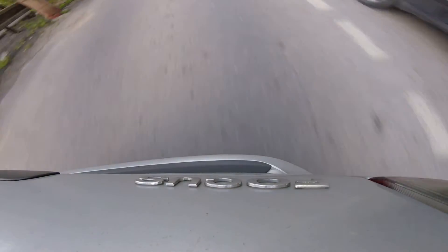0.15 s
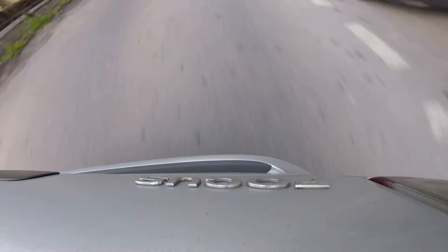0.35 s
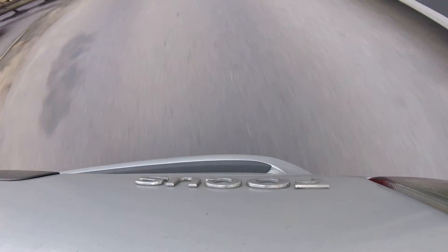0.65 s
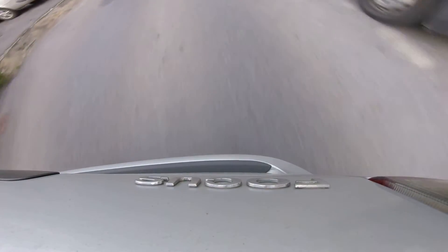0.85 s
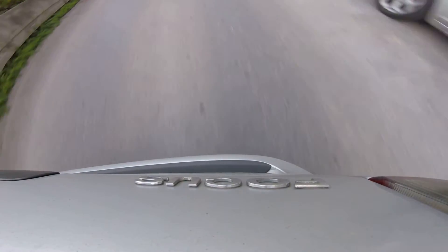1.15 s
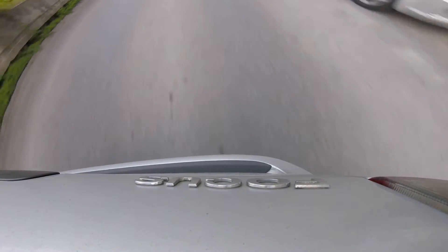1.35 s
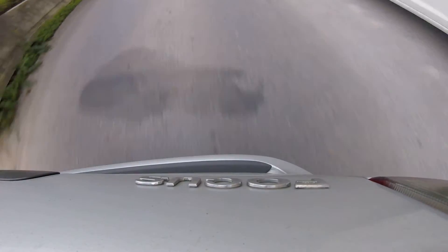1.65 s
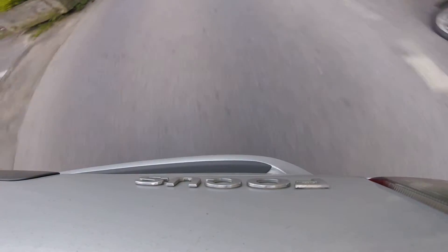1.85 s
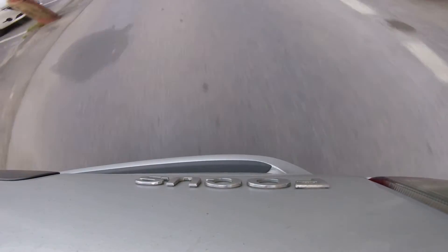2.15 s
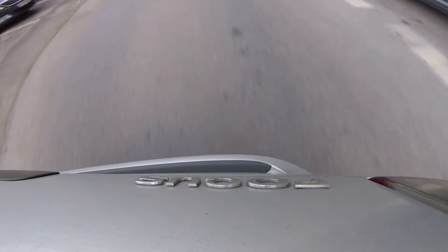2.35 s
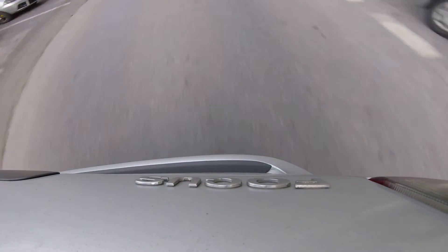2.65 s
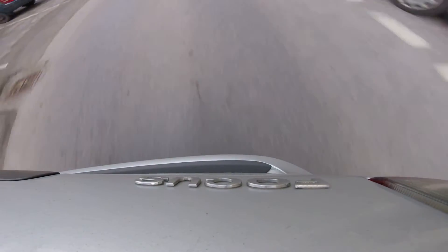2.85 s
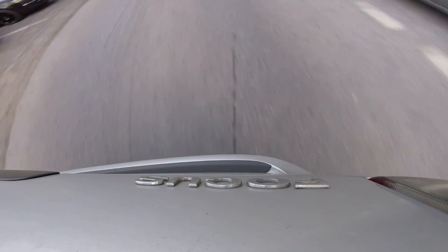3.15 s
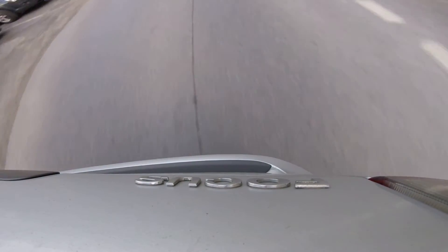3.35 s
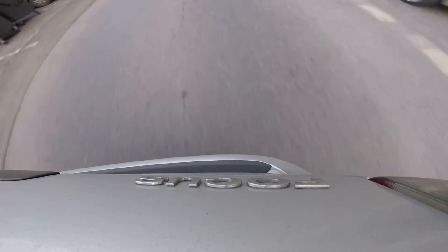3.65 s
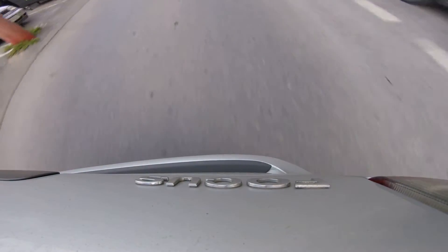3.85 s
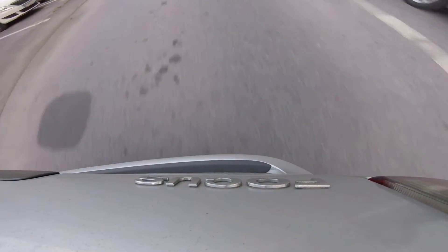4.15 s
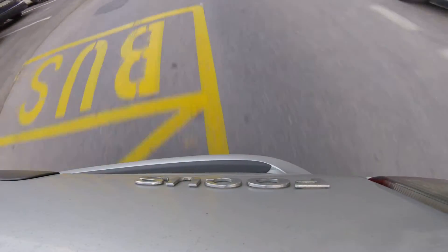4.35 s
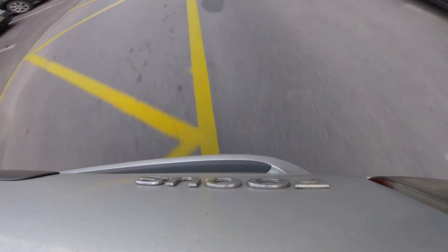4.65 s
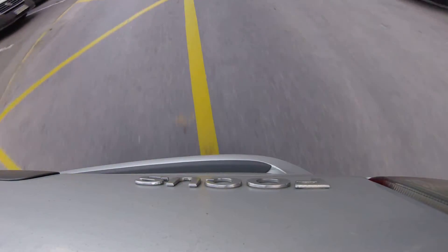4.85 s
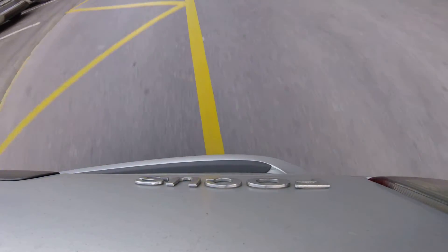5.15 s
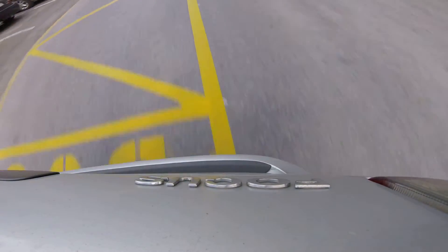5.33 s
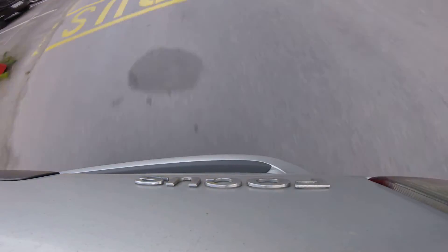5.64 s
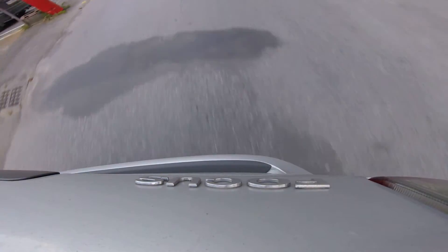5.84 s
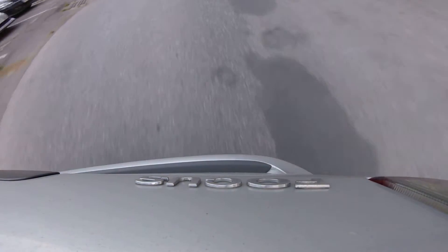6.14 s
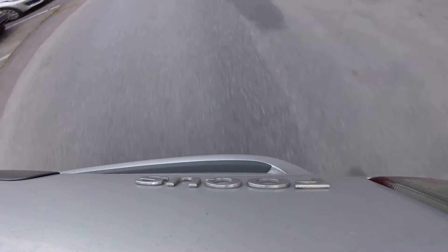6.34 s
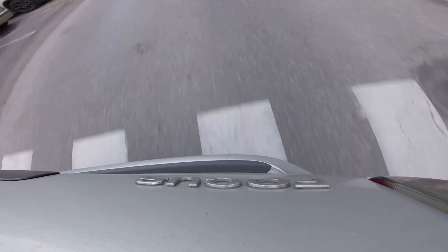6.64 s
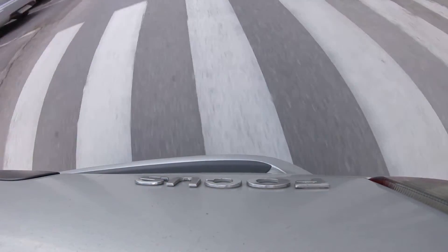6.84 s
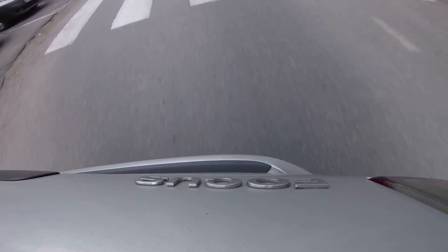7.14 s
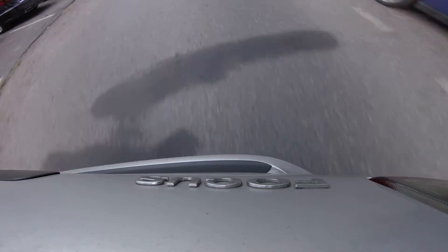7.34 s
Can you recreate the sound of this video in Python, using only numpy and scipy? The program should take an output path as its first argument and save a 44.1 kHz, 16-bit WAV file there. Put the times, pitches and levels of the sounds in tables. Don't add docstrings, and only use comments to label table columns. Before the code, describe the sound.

A car's open exhaust whistles down as the throttle shuts, burbles low, then barks back up loudly over wind rumble and tyre roar.

```python
import sys
import numpy as np
from scipy import signal
from scipy.fft import rfft, irfft, next_fast_len
from scipy.io import wavfile
from scipy.ndimage import uniform_filter1d

SR = 44100
rng = np.random.default_rng(int(sys.argv[2]) if len(sys.argv) > 2 else 0)


def transcribe(u):
    v = np.clip(np.atleast_2d(u).T, -1, 1)
    q = np.round(v * 32767).astype(np.int16)
    wavfile.write(sys.argv[1], SR, q)


def amplitude_ratio(level_db):
    exponent = np.asarray(level_db, float) / 20
    return 10 ** exponent


N = 330309
T = np.arange(N) / SR

# time_s, firing_hz, exhaust_level_db, sharpness_0_to_1.2, gas_flow_db
ENGINE = [(0, 71.98, -27.5, 0.92, -26), (.15, 71.97, -42, 0.77, -36.5), (.5, 63.64, -34.5, 0.57, -36.5),
          (.95, 49.94, -32, 0.5, -37), (1.2, 48.4, -30, 0.85, -51), (1.35, 49.54, -25, 1.02, -30.5),
          (2.1, 50.44, -22.5, 0.52, -31), (2.9, 51.61, -24, 0.35, -29), (3.12, 52.28, -32.5, 0, -40.5),
          (3.45, 46.99, -36, 0.55, -43), (3.6, 42.28, -39.5, 0.47, -37), (4.2, 28.21, -38, 0.42, -60),
          (5.45, 26.94, -33.5, 0.46, -50.5), (5.95, 37.41, -26.5, 0.77, -47.5),
          (6.24, 48.84, -24, 1.2, -46.5), (6.4, 56.91, -24.5, 0.85, -50), (6.6, 59.35, -24, 0.95, -38.5),
          (7.49, 58.06, -20, 0.77, -29.5)]


def unit(x):
    return x / np.sqrt(np.mean(x ** 2))


def curves(table):
    s, *columns = np.transpose(table)
    return [np.interp(T, s, column) for column in columns]


def db_at(points, hz):
    point_hz, point_db = np.transpose(points)
    return np.interp(np.log(hz), np.log(point_hz), point_db)


def swells(events):
    coarse = T[::256]
    rise_db = sum(db * np.exp(-4 * ((coarse - s) / max(length, .03)) ** 2) for s, db, length in events)
    return np.interp(T, coarse, rise_db)


def colour(x, points):
    size = 1 << 14
    hz = np.arange(size // 2 + 1) * SR / size + 1
    cepstrum = irfft(db_at(points, hz) * np.log(10) / 20)
    cepstrum[1:size // 2] *= 2
    cepstrum[size // 2 + 1:] = 0
    return signal.fftconvolve(x, irfft(np.exp(rfft(cepstrum))))[:N]


def resonance(x, hz, width_hz):
    return signal.lfilter(*signal.iirpeak(hz, hz / width_hz, fs=SR), x)


def walk(rate):
    hold = int(SR / rate)
    steps = np.repeat(rng.standard_normal(N // hold + 1), hold)
    return 1.3 * uniform_filter1d(uniform_filter1d(steps, hold), hold)[:N]


def patchy(points, swell_db, flicker_db, rate):
    size = next_fast_len(N)
    spectrum = rfft(colour(rng.standard_normal(N), points), size)
    octave = np.log2(np.arange(len(spectrum)) * SR / size + 1)
    total = np.zeros(N)
    for k in range(3, 15):
        band = irfft(spectrum * np.clip(1 - abs(octave - k), 0, 1), size)[:N]
        total += band * amplitude_ratio(flicker_db * walk(rate))
    return unit(total * amplitude_ratio(swell_db * walk(2.7)))


def tone(hz, db, start, end, wobble, shimmer_db, rise=0.026, fall=0.027):
    fade_in = (T - start) / rise + (start < 0)
    fade = np.clip(np.minimum(fade_in, (end - T) / fall), 0, 1)
    turns = np.cumsum(hz * (1 + wobble * walk(50))) / SR
    return np.sqrt(2) * fade * amplitude_ratio(db + shimmer_db * walk(40)) * np.sin(2 * np.pi * turns)


def knocks(events):
    out = np.zeros(N + SR)
    t = np.arange(SR // 2) / SR
    push = 1 - np.exp(-t / 0.0014)
    for s, db, hz, t60 in events:
        decay = np.exp(-np.log(1000) * t / max(t60, .01))
        out[int(s * SR):][:len(t)] += amplitude_ratio(db) * push * decay * np.sin(2 * np.pi * hz * t)
    return out[:N]


def crank(hz):
    # time_s, extra_db
    first_barks = [(1.456, 5), (1.621, 4), (1.944, 5), (2.104, 4), (2.184, 2), (2.262, 0.5), (2.341, 3.5),
                   (2.576, 4), (2.653, 5), (2.732, 2.5), (6.613, 7), (6.682, 4), (6.747, 5.5), (6.818, 3),
                   (6.886, 5), (7.024, 3.5), (7.092, 2), (7.162, 1.5), (7.297, 4), (7.364, 3),
                   (7.431, -0.5)]
    # time_s, extra_db
    further_barks = [(1.417, 5.7), (1.435, 5), (1.66, 6), (1.742, 6), (1.902, 4.4), (1.984, 4), (2.064, 4),
                     (2.383, 5), (2.48, 7), (2.555, 5), (2.634, 4.4), (2.71, 6), (2.828, 5.4), (2.923, 6),
                     (7.125, 8), (7.191, 4), (7.26, 6), (7.448, 2)]
    cylinder_late = [0.022, -0.017, 0.0074, -0.005]
    lead_s = .0005
    turns = np.cumsum(hz) / SR
    bark_s, _ = np.transpose(first_barks)
    slip = (np.interp(bark_s - lead_s, T, turns) + 2) % 4 - 2
    slip = np.unwrap(slip, period=4)
    turns = turns - np.interp(T, bark_s, slip) + 4 * np.ceil(slip.max() / 4)
    k = np.arange(int(turns[-1]) + 2)
    late = np.array(cylinder_late)[k % 4] + .003 * rng.standard_normal(len(k))
    phase = turns - np.interp(turns, k, late)
    bark_s, bark_db = np.transpose(first_barks + further_barks)
    barking = np.rint(np.interp(bark_s - lead_s, T, turns)).astype(int)
    return turns, phase, np.bincount(barking, bark_db, len(k))


def order_levels(hz, level_db, sharp):
    order_db = [0.5, 0, -5]
    # frequency_hz, level_db
    mouth = [(27, 4), (34, -14), (54, 0), (66, 3.5), (105, -1.5), (140, 2), (185, 1), (212, -14.5)]
    # frequency_hz, level_db
    pipe = [(90, 2), (110, -9.5), (146, -3.5), (163, -26.5), (200, -15), (235, -22), (295, -11), (360, -29)]
    # time_s, swell_db, length_s
    surges = [(.04, 0.5, 0.12), (.35, 3, .15), (1.48, 2, 0.3), (1.85, -4.5, 0.44), (2.27, 1, 0.29),
              (2.55, 1, 0.16), (2.78, 3, 0.14), (4.22, -5, 0.34), (5.3, -1.5, 0.15), (6.0, 0.5, 0.1),
              (6.73, 2, 0.11), (6.86, -3.5, 0.14), (7.3, 1, 0.18)]
    surge_share = [0.93, 0.89, 0.72]
    # time_s, sharpness_change, length_s
    clutch = [
        (.04, 0.71, 0.11),
        (.22, 0.6, 0.13),
        (1.0, 0.063, 0.17),
        (6.43, -1.1, 0.27),
    ]
    surge_db = swells(surges)
    softness_db = 8.5 * (1 - sharp - swells(clutch))
    apart_db = 11.5 * np.log2(46.6 / hz).clip(0)
    slope_db = softness_db - apart_db
    levels = []
    for n, db in enumerate(order_db):
        wander_db = 1.2 * walk(9.0)
        pipe_db = db - n * slope_db + db_at(mouth, (n + 1) * hz)
        levels.append(level_db + pipe_db + wander_db + surge_share[n] * surge_db)
    levels[1] += -10 / (1 + (hz / 29) ** 16)
    return levels + [levels[2] + db_at(pipe, n * hz) for n in range(4, 7)]


def thuds(hz, levels, turns, phase, firings):
    cylinder_db = [0.97, 1, 0.87, 0.35]
    k = np.arange(firings)
    size = amplitude_ratio(np.array(cylinder_db)[k % 4] + 0.46 * rng.standard_normal(firings))
    turned = np.pi / (1 + (hz / 45) ** 32)
    dip = .26 - .017 * (hz.clip(48, 60) - 54)
    stack = np.zeros(N)
    for n, db in enumerate(levels):
        angle = 2 * np.pi * (n + 1) * (phase - dip) + n % 2 * turned + np.pi * (n == 3)
        stack += amplitude_ratio(db) * np.cos(angle)
    return -np.sqrt(2) * np.interp(turns, k, size) * stack


def tailpipe(phase, bark_db, rasp_db):
    crack_db = [7.5, 3.5, 1.5, -1]
    # frequency_hz, width_hz, level_db
    pipe_modes = [(137.5, 1.3, 4.5), (189.7, 3.4, 9), (278.3, 20, 2), (326, 7.4, -6), (371.6, 10, -0.5),
                  (420, 21, -4), (553.7, 21, 5.5), (609, 17, -3.5), (715, 31, -10), (783, 18, -3.5),
                  (810, 20, -16), (1080, 26, -7)]
    # frequency_hz, width_hz, level_db
    rasp_modes = [(571, 78, 8.5), (649, 260, 7)]
    k = np.arange(len(bark_db))
    chance = rng.standard_normal(len(k))
    firing = phase.clip(0).astype(int)
    crack_size = amplitude_ratio(np.array(crack_db)[k % 4] + chance + bark_db)
    cracks = np.diff(firing, prepend=0) * crack_size[firing]
    cracks = signal.sosfilt(signal.butter(4, 1000, fs=SR, output="sos"), cracks)
    ring = np.zeros(N)
    for n, (hz, width_hz, db) in enumerate(pipe_modes):
        ring += (-1) ** n * amplitude_ratio(db) * resonance(cracks, hz, width_hz) / np.sqrt(width_hz)
    snap = resonance(resonance(cracks, 668, 380), 668, 380)
    ring = unit(ring) + amplitude_ratio(-11) * unit(snap)
    puff = amplitude_ratio(1.5 * chance + bark_db / 2)[firing] * np.exp(-(phase % 1) / .2)
    gas = (puff + 0.46) * rng.standard_normal(N)
    rasp = np.zeros(N)
    for hz, width_hz, db in rasp_modes:
        rasp += amplitude_ratio(db) * resonance(resonance(gas, hz, 1.22 * width_hz), hz, 1.22 * width_hz)
    ring_share = 0.66
    ring_db = 2.5 - (1 - ring_share) * (rasp_db + 33)
    return (unit(rasp) + amplitude_ratio(ring_db) * ring) * amplitude_ratio(rasp_db - 4.5)


def engine():
    hz, level_db, sharp, rasp_db = curves(ENGINE)
    turns, phase, bark_db = crank(hz)
    levels = order_levels(hz, level_db, sharp)
    return thuds(hz, levels, turns, phase, len(bark_db)) + tailpipe(phase, bark_db, rasp_db)


def pipe_lift_db(hz):
    return 7.5 * np.exp(-((hz - 543) / 64) ** 2)


def whistles():
    # time_s, pitch_hz, level_db
    lines = [
        [(0, 785, -28.5), (.065, 797, -24), (.095, 850, -19.5), (.15, 808, -20), (.36, 723, -23),
         (.62, 606, -26), (.9, 500, -31.5), (1.0, 482, -43), (1.14, 428, -42)],
        [(2.9, 540, -42), (2.985, 548, -45), (3.0, 548, -27.5), (3.13, 538, -27), (3.27, 495, -37),
         (3.4, 465, -42), (3.68, 418, -48), (3.71, 410, -36.5), (4.04, 363, -38)],
    ]
    # time_s, pitch_hz, level_db
    partners = [
        [(.12, 880, -37), (.3, 810, -41.5), (.45, 749, -38), (.62, 664, -41.5), (.8, 593.5, -37),
         (1.0, 525, -42), (1.1, 480, -50)],
        [(3.0, 600, -30), (3.08, 596, -35), (3.15, 580, -34), (3.27, 552, -34), (3.32, 538.4, -34),
         (3.42, 516, -35.5), (3.46, 492.4, -47), (3.62, 481, -38)],
    ]
    # time_s, swell_db, length_s
    catches = [(.03, -2, .03), (.24, 2.5, 0.041), (.29, -1, .05), (.45, -1, 0.19), (.555, 3.5, 0.064),
               (.61, -2, .04), (.4, -3, .05), (.71, 4, .07), (.765, -0.5, 0.031), (.8, 2.5, .05),
               (1.1, 0.5, .1), (.88, 3, 0.049), (.96, -2, 0.042), (3.02, 0, .04), (3.04, -2, .02),
               (3.07, 2, .05), (3.12, -2.5, 0.052), (3.165, 3, 0.035), (3.2, 0, .04), (3.25, -1.5, .06),
               (3.31, 2.5, .05), (3.37, -2, 0.04), (3.72, 2, .04), (3.92, 2, .12)]
    wobbles = [.005, .01]
    shimmers = [1.1, 2.0]
    out = np.zeros(N)
    firing_hz, catch_db = curves(ENGINE)[0], swells(catches)
    for line, partner, *rough in zip(lines, partners, wobbles, shimmers):
        (hz, db), (above_hz, above_db) = curves(line), curves(partner)
        db = db + catch_db
        above_db = above_db + catch_db / 2
        below_hz = hz - firing_hz
        below_db = db - 18
        start, end = line[0][0] - .02, line[-1][0]
        out += tone(hz, db + pipe_lift_db(hz), start, end, *rough)
        out += tone(below_hz, below_db + pipe_lift_db(below_hz), start, end, *rough)
        out += tone(above_hz, above_db + pipe_lift_db(above_hz), partner[0][0], partner[-1][0], *rough)
    return out


def wind():
    # frequency_hz, level_db
    rumble = [(12, -10), (20, 14.5), (35, 8.5), (60, -2), (200, -32.5), (1000, -111)]
    # time_s, swell_db, length_s
    gusts = [(.22, 4, 0.15), (.7, 2, 0.15), (.95, 5, 0.8), (1.42, -2.5, 0.24), (1.75, 7.5, 0.3),
             (2.25, 10, 0.54), (2.7, 9.5, 0.26), (3.1, 2, 0.53), (3.55, 7, 0.91), (3.95, 1.5, 0.34),
             (4.95, 0, 0.22), (5.45, 4, 0.88), (5.8, 7, 0.2), (5.92, 4, 0.13), (6.2, 9, 0.23),
             (6.72, 10.5, 0.12), (6.96, 7, 0.17), (7.3, -12.5, 0.38)]
    return patchy(rumble, 0.31, 2.6, 6.6) * amplitude_ratio(-31.5 + swells(gusts))


def tailgate():
    # frequency_hz, level_db
    boom_points = [(30, -14), (55, 14), (90, 9), (160, 7), (220, 2.5), (400, -1.5), (520, -9), (800, -58)]
    # time_s, swell_db, length_s
    patches = [(.3, -3, 0.92), (.75, -1.5, 0.15), (1.1, 3, 0.18), (1.45, 0.5, .3), (1.9, 1.5, 0.72),
               (2.5, -0.5, .6), (3.28, -9, 0.42), (3.75, 3, 0.67), (4.3, -2, 0.3), (4.75, -5.5, 0.25),
               (5.03, 3, 0.22), (5.3, 1, 0.23), (5.9, 1.5, 0.37), (6.72, 5.5, 0.31), (6.9, 3.5, .3),
               (7.25, 1.5, 0.47)]
    # frequency_hz, width_hz, level_db
    panel_modes = [(285, 8.2, -6.5), (323, 30, 0.5), (432.5, 24, -2.5)]
    # time_s, swell_db, length_s
    panel_swells = [
        (4.7, 15, 0.34),
        (5.25, 12.5, 0.94),
        (5.85, 13, 0.56),
        (6.2, 5.5, 0.33),
        (6.9, 14.5, 1),
        (2.4, 10.5, 1),
    ]
    body = patchy(boom_points, 0.64, 1.3, 14.0) * amplitude_ratio(-31)
    patch_db = swells(patches)
    shake = signal.sosfiltfilt(signal.butter(2, 190, fs=SR, output="sos"), body)
    boom = shake * amplitude_ratio(patch_db) + (body - shake) * amplitude_ratio(-0.84 + 0.78 * patch_db)
    panel = sum(amplitude_ratio(db) * resonance(body, hz, width_hz) for hz, width_hz, db in panel_modes)
    return boom + amplitude_ratio(swells(panel_swells) - 9.5) * panel


def tyres():
    # time_s, level_db
    asphalt = [(0, -40.5), (1, -39), (1.4, -37.5), (3.05, -38), (3.14, -39.5), (4.4, -42), (5.4, -39.5),
               (5.47, -43.5), (6.4, -42), (6.7, -41), (7.05, -42), (7.49, -40)]
    # time_s, swell_db, length_s
    passes = [(.05, 3.5, 0.42), (.6, 4.5, 0.39), (1.2, 2.5, 0.13), (1.6, 5.5, 0.17), (1.92, 2, 0.088),
              (2.25, 3, 0.23), (2.7, 3, 0.3), (3.0, 2.5, 0.12), (3.5, 1.5, 0.11), (3.82, 2.5, 0.2),
              (4.15, 3.5, 0.22), (4.6, 2, 0.19), (6.05, 0, 0.16), (7.3, 4, 0.24)]
    # frequency_hz, level_db
    roar_points = [(150, -34.5), (300, -19), (450, -8.5), (800, -12.5), (1100, -12), (1900, -18),
                   (3800, -31), (8000, -91.5)]
    # frequency_hz, level_db
    hiss_points = [(2500, -9), (4300, 0.5), (6100, -1.5), (6460, -0.5), (6800, -4.5), (8000, -17),
                   (10000, -27), (14000, -50.5)]
    (tyre_db,), swell_db = curves(asphalt), swells(passes)
    roar = patchy(roar_points, 0.85, 1.0, 12.0) * amplitude_ratio(tyre_db + 0.63 * swell_db + 1.5)
    hiss = patchy(hiss_points, .3, .6, 22.0) * amplitude_ratio(tyre_db + swell_db - 19.5)
    return roar + hiss


def faint_hiss():
    # frequency_hz, level_db
    faint_hiss_points = [(5000, -21), (8000, 8.5), (10000, -3), (11000, -17), (14000, -32)]
    # time_s, swell_db, length_s
    faint_hiss_swells = [
        (5.0, 4.5, 1.6),
        (6.5, 4, 1.2),
    ]
    return unit(colour(rng.standard_normal(N), faint_hiss_points)) * amplitude_ratio(-79 + swells(faint_hiss_swells))


def buffets():
    # time_s, peak_db, pitch_hz, t60_s
    slaps = [(.215, -16, 35, 0.12), (.29, -20, 60, .08), (0.694, -15, 35, .14), (.76, -23, 45, .1),
             (0.892, -11.5, 40, 0.08), (.945, -13, 35, 0.11), (1.102, -19.5, 45, .1),
             (1.166, -13.5, 28, 0.2), (1.68, -9, 28, 0.19), (1.725, -12, 28, 0.096), (3.539, -10, 30, 0.11),
             (3.62, -13, 40, 0.13), (3.75, -19, 45, 0.12), (3.859, -10, 28, 0.15), (4.099, -22, 32, .12),
             (4.399, -13, 60, 0.11), (4.989, -16, 45, 0.091), (5.471, -14, 30, 0.12), (6.696, -15, 75, .07),
             (6.949, -24, 50, 0.072)]
    return knocks(slaps)


def road_joints():
    # time_s, peak_db, pitch_hz, t60_s
    thumps = [(0.696, -14, 200, 0.046), (0.871, -13.5, 123, 0.086), (.875, -16.5, 245, 0.056),
              (3.501, -17, 90, 0.17), (3.76, -20, 320, 0.059), (3.922, -5.5, 55, 0.057),
              (3.992, -13, 60.4, .1), (4.968, -13, 240, 0.047), (4.972, -20, 353, 0.058),
              (5.091, -26, 202, 0.16), (6.699, -22.5, 420, .1), (6.719, -23, 82.4, 0.055),
              (6.768, -17.5, 244, 0.061)]
    return knocks(thumps)


def grit():
    # time_s, peak_db, centre_hz
    grains = [
        (1.78, -54, 8000),
        (3.091, -43, 8000),
        (5.4275, -35, 5200),
        (6.901, -42.5, 8080),
        (6.954, -45.5, 7920),
    ]
    out = np.zeros(N + SR)
    decay = np.exp(-np.arange(200) / (.00003 * SR))
    for s, db, hz in grains:
        tick = (1 + .4 * rng.standard_normal(200)) * decay
        tick = signal.sosfilt(signal.butter(2, [hz / 1.7, hz * 1.7], "band", fs=SR, output="sos"), tick)
        out[int(s * SR):][:len(tick)] += amplitude_ratio(db) * tick / abs(tick).max()
    return out[:N]


def bird():
    # time_s, pitch_hz, level_db
    chirp = [
        (5.205, 4990, -72),
        (5.22, 4924, -63),
        (5.256, 4810, -62),
        (5.267, 4790, -76),
        (5.28, 4765, -65),
        (5.314, 4720, -66),
        (5.335, 4700, -76),
    ]
    return tone(*curves(chirp), chirp[0][0], chirp[-1][0], .008, 3.5, rise=.005, fall=.01)


def scene():
    car = engine() + whistles() + tailgate() + tyres()
    air = wind() + faint_hiss() + buffets()
    return (car + air + road_joints() + grit() + bird())[None]


def roll_off(x):
    return signal.sosfilt(signal.butter(12, 13975, fs=SR, output="sos"), x)


def record(dry):
    x = signal.sosfilt(signal.butter(1, 12, "high", fs=SR, output="sos"), dry)
    return roll_off(np.tanh(0.85 * x) / 0.73)


dry = scene()
out = record(dry)
transcribe(out)
```